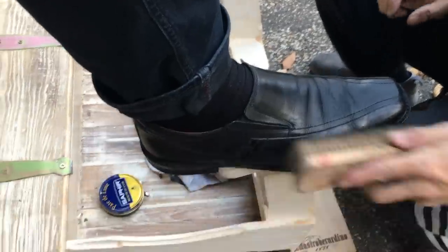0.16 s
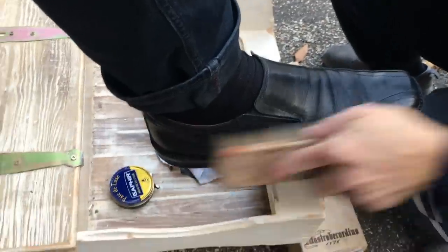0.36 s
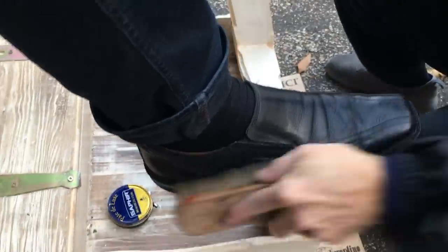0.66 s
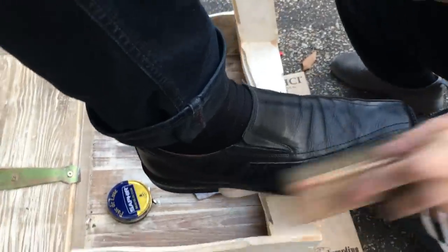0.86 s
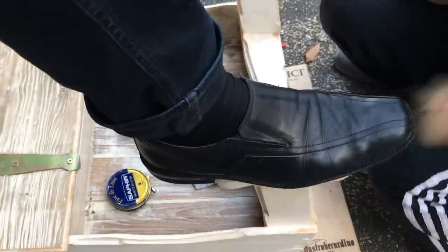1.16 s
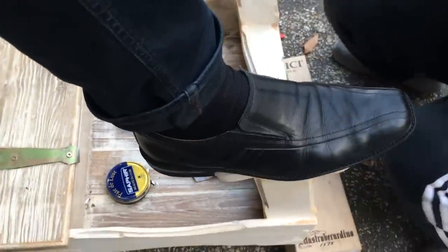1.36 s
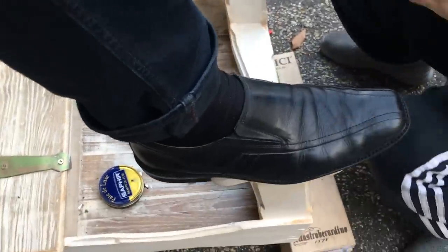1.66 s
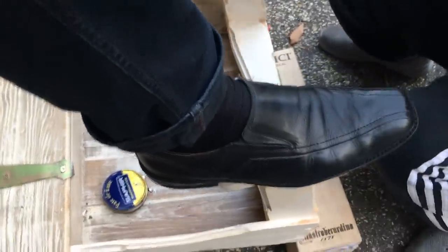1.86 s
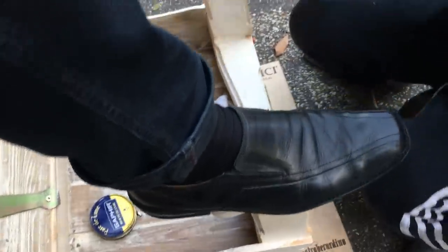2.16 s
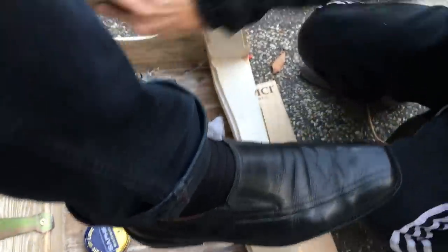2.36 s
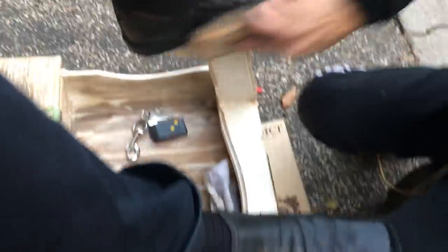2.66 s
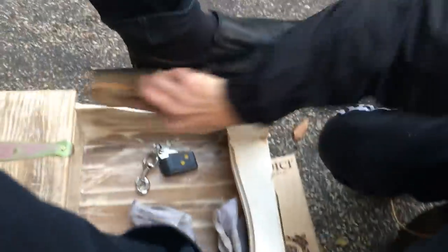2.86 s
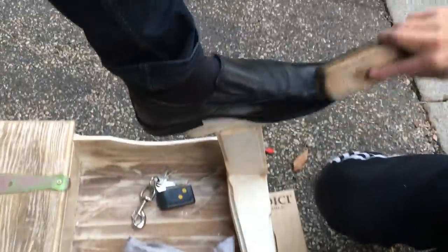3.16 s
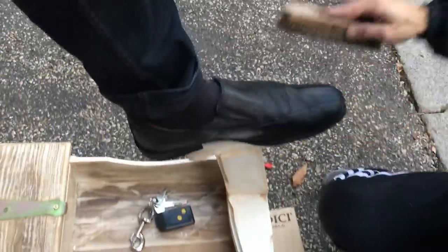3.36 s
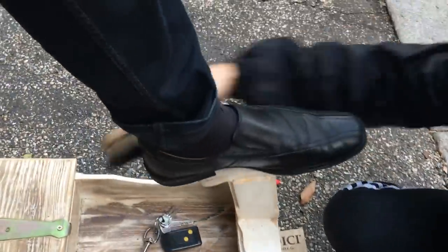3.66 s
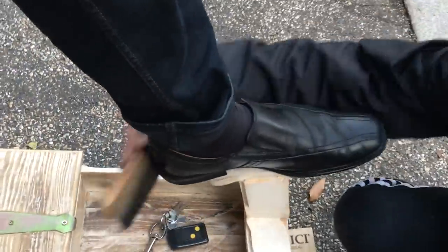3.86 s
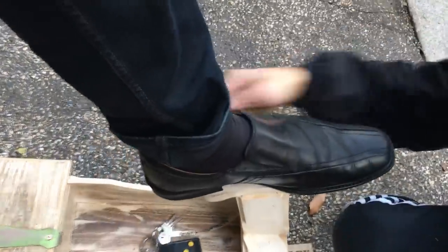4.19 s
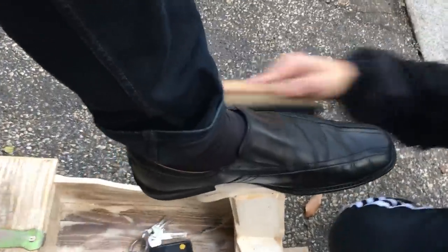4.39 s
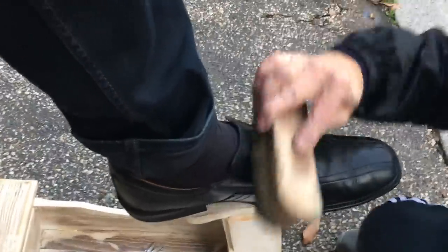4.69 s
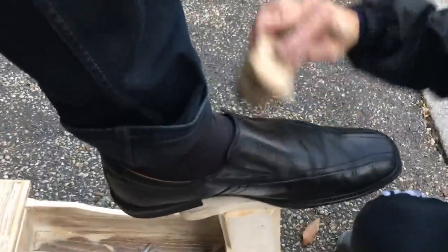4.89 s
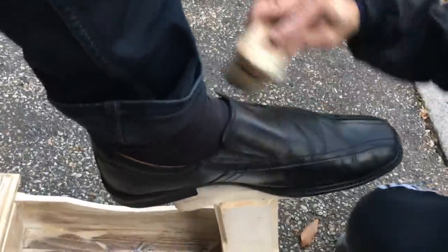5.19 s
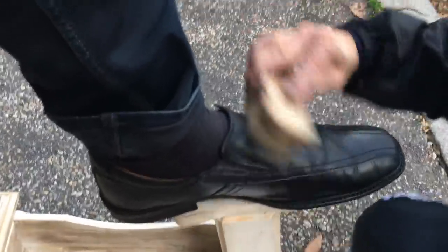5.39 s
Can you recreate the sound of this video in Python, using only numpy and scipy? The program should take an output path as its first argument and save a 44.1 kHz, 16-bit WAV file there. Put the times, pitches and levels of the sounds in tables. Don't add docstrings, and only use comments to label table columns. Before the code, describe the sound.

A shoe is brushed in brisk, scratchy bursts close by, the wooden block knocking now and then, while traffic hisses and a motor pulls away.

```python
import sys
import numpy as np
from scipy import signal
from scipy.fft import rfft, irfft
from scipy.io import wavfile
from scipy.ndimage import uniform_filter1d

SR = 44100
rng = np.random.default_rng(int(sys.argv[2]) if len(sys.argv) > 2 else 0)


def field_ratio(decibels):
    return 10 ** (np.asarray(decibels, dtype=float) / 20)


def file_out(sig):
    cols = np.atleast_2d(sig).T
    lim = np.clip(cols, -1, 1)
    pcm = np.round(lim * 32767).astype(np.int16)
    wavfile.write(sys.argv[1], SR, pcm)


N = 244314
T = np.arange(N) / SR
HZ = np.maximum(np.arange(N // 2 + 1) * SR / N, 1)


def unit(x):
    return x / np.sqrt(np.mean(x ** 2))


def colour(points):
    hz, db = np.transpose(points)
    return field_ratio(np.interp(np.log(HZ), np.log(hz), db))


def walk(rate_hz):
    k = int(SR / rate_hz)
    held = np.repeat(rng.standard_normal(N // k + 1), k)
    return 1.39 * uniform_filter1d(uniform_filter1d(held, k), k)[:N]


def bands(x, gain, lo_hz, hi_hz, flicker_db, rate_hz, level_db):
    spec, out = rfft(x) * gain, 0
    edges = np.geomspace(lo_hz, hi_hz, int(3 * np.log2(hi_hz / lo_hz)) + 1)
    for a, b in zip(edges, edges[1:]):
        band = irfft(spec * (HZ >= a) * (HZ < b), N)
        out = out + band * field_ratio(flicker_db * walk(rate_hz) + level_db(np.sqrt(a * b)))
    return out


def ring(push, modes, cycles):
    t = np.arange(len(push)) / SR
    body = 0
    for hz, db in modes:
        body = body + field_ratio(db) * np.sin(2 * np.pi * hz * t) * t * hz * np.exp(-t * hz / cycles)
    y = signal.fftconvolve(push, body)[:len(push)]
    return y / np.max(np.abs(y))


def street():
    # t/s, level/dB
    swell_points = [(0.0, -46), (0.2, -40), (0.52, -48.5), (0.55, -40), (2.56, -44.5), (2.59, -41),
                    (2.85, -45), (2.93, -41), (3.08, -47), (3.32, -41.5), (3.36, -53), (3.47, -36.5),
                    (3.55, -52), (3.61, -42.5), (5.09, -46), (5.28, -38), (5.4, -49), (5.54, -43)]
    # f/Hz, density/dB per Hz
    rumble_colour = [(20, -36), (31, -2.5), (40, -9.5), (52, 3), (64, 0), (80, -9.5), (115, -9.5),
                     (145, -13.5), (200, -14.5), (300, -22)]
    # f/Hz, density/dB per Hz
    tyre_colour = [(180, -29), (300, -2), (492, -6.5), (562, -4), (641, -4.5), (1330, -4), (1870, -10.5),
                   (2400, -20.5), (2980, -20.5), (4880, -30), (15500, -38)]
    split_hz = 300
    swell_db = np.interp(T, *np.transpose(swell_points))
    mean_db = np.mean(swell_db)
    hiss_db = -48 - 0.44 * T

    def throb_db(hz):
        return mean_db + np.clip(80 / hz, 0, 1) ** 2 * (swell_db - mean_db)

    rumble = bands(rng.standard_normal(N), colour(rumble_colour), 20, split_hz, 1.0, 2.95, throb_db)
    tyres = bands(rng.standard_normal(N), colour(tyre_colour), split_hz, 17000, 0.92, 6.6, lambda hz: hiss_db)
    return field_ratio(29.0) * rumble + field_ratio(14.5) * tyres


def engine():
    # t/s, third order f/Hz, third order level/dB
    run_up = [
        (0.0, 112.7, -44),
        (0.222, 114.0, -73),
        (0.42, 116, -43),
        (0.756, 119.3, -53.5),
        (0.952, 123.0, -41.5),
        (1.316, 123.3, -51.5),
        (1.444, 123.2, -54),
        (1.602, 125.2, -57),
        (1.9, 114.0, -59),
    ]
    s, third_hz, third_db = np.transpose(run_up)
    phase = 2 * np.pi * np.cumsum(np.interp(T, s, third_hz) / 3) / SR
    fade_db = -25 * np.maximum(T - s[-1], 0)
    orders = [(2, -42 - 10 * s), (3, third_db), (4, -48.5 - 7.5 * s)]
    out = 0
    for k, db in orders:
        wobble = field_ratio(0.54 * walk(9.1)) * np.exp(.6j * walk(14))
        level = np.sqrt(2) * field_ratio(np.interp(T, s, db) + fade_db)
        out = out + level * np.imag(wobble * np.exp(1j * k * phase))
    return out


def knocks():
    # t/s, peak level/dB, upper ring f/Hz, lower ring f/Hz, lower ring level/dB
    taps = [(.8673, -24, 2950, 1960, 12), (1.048, -33.5, 1460, 836, -4), (1.364, -42, 1650, 1000, 6),
            (1.8388, -29, 2800, 1530, 2), (2.0548, -34.5, 2020, 830, 6), (2.062, -40, 1980, 1060, 7),
            (2.0683, -33, 2060, 880, -7), (2.0905, -36, 1910, 690, 4), (4.605, -39, 3940, 2900, -10),
            (4.644, -31, 2160, 2460, 2), (4.6558, -25.5, 3360, 2000, -3), (4.6568, -27.5, 1440, 974, -8)]
    # t/s, peak level/dB, upper ring f/Hz, lower ring f/Hz, lower ring level/dB
    scuffs = [(.262, -39, 1930, 864, -1), (.267, -36, 2000, 870, -5), (.273, -34.5, 2130, 860, 5),
              (0.8682, -24, 1780, 1250, -1), (1.845, -34.5, 2100, 1250, -9), (2.0728, -31, 2060, 834, 0.5),
              (2.0835, -38, 2076, 1240, 0), (2.327, -36.5, 1860, 1140, -8), (2.708, -36, 1960, 1370, -5),
              (2.7641, -30, 3950, 1250, -2), (2.7692, -32.5, 1500, 1020, 8), (3.814, -35.5, 1800, 680, 0.5),
              (4.647, -33, 2230, 1020, -8), (4.6525, -36, 1980, 1560, -3), (4.987, -43, 1660, 1300, -13),
              (5.0285, -31.5, 2290, 1800, -11)]
    # f/Hz, level/dB
    wood = [(620, -6), (1300, -1.5), (1700, -1.5), (2050, 3), (3030, 1), (3450, -4)]
    # t/s, peak level/dB
    cracks = [(0.8675, -29), (0.868, -30), (0.8723, -29), (1.048, -55), (1.363, -43), (1.762, -40),
              (1.839, -38), (2.0548, -36), (2.0682, -35), (2.7645, -38), (3.5484, -35), (4.604, -34),
              (4.6433, -33), (4.656, -46), (4.99, -31)]
    # f/Hz, level/dB
    crack_modes = [(3300, -1), (4300, -2), (5400, 0), (6400, -9), (7600, -25), (9500, -5)]
    # t/s, peak level/dB, f/Hz, t60/s
    thuds = [
        (0.8689, -37.5, 510, 0.097),
        (0.868, -36.5, 400, 0.07),
        (1.052, -33.5, 314, 0.032),
        (1.839, -37, 338, 0.048),
        (2.072, -34, 606, 0.033),
        (2.770, -39, 500, 0.024),
        (3.816, -41, 410, 0.017),
        (3.819, -32.5, 188, 0.063),
        (4.6549, -28.5, 216, 0.041),
        (4.659, -30, 393, 0.017),
    ]
    size = 4096
    out, t = np.zeros(N + size), np.arange(size) / SR
    tap_ms, scuff_ms = 1.25, 2.24
    blows = [row + (tap_ms,) for row in taps] + [row + (scuff_ms,) for row in scuffs]
    for s, db, hi_hz, lo_hz, lo_db, ms in blows:
        draw = rng.standard_normal(size)
        push = draw ** 3 / 2 * np.exp(-(1000 * t / ms) ** 4)
        push[0] = 4
        hit = ring(push, wood + [(hi_hz, 0), (lo_hz, lo_db + 0.5)], 1.42)
        rustle = 0.19 * draw * np.exp(-t / 0.0054)
        spread = ring(push + rustle, [(hi_hz, 0), (lo_hz, lo_db)], 0.63)
        out[int(s * SR):][:size] += field_ratio(db) * (hit + 0.66 * spread)
    for s, db in cracks:
        burst = rng.standard_normal(size) * np.exp(-t / 0.0023)
        out[int(s * SR):][:size] += field_ratio(db) * ring(burst, crack_modes, 1.0)
    for s, db, hz, t60 in thuds:
        out[int(s * SR):][:size] += field_ratio(db) * np.sin(2 * np.pi * hz * t) * 1000. ** (-t / t60)
    return out[:N]


def pressure():
    # full contact t/s, hold/s, level/dB, drift over hold/dB, lift-off/dB per s
    side = [
        (0.0, 0.11, -51, -4, 123),
        (.422, 0.088, -48.5, -5.5, 300),
        (.764, 0.094, -46.5, -6.5, 400),
        (1.096, 0.14, -46.5, -7.5, 1200),
        (1.78, 0.12, -56, 7, 111),
        (2.105, 0.1, -53.5, 1, 696),
        (2.29, 0.073, -53.5, 0.5, 140),
        (2.5, 0.12, -55, 1.5, 420),
        (2.722, 0.069, -47.5, -3, 198),
        (2.935, 0.086, -59, 10, 61),
    ]
    # full contact t/s, hold/s, level/dB, drift over hold/dB, lift-off/dB per s
    back = [
        (.272, 0.026, -50.5, -1.5, 278),
        (.618, 0.048, -50, -1, 270),
        (.912, 0.087, -51.5, 1.5, 238),
    ]
    # full contact t/s, hold/s, level/dB, drift over hold/dB, lift-off/dB per s
    heel = [
        (3.547, 0.28, -60, 6.5, 252),
        (3.932, 0.12, -54, -9.5, 900),
        (4.2, 0.11, -58.5, 8, 280),
        (4.375, 0.055, -56.5, 9, 300),
        (4.43, 0.087, -48.5, -3, 463),
    ]
    # full contact t/s, hold/s, level/dB, drift over hold/dB, lift-off/dB per s
    instep = [
        (4.07, 0.045, -52.5, -2.5, 160),
        (4.655, 0.047, -48, -2.5, 192),
        (4.77, 0.08, -52.5, 5.5, 605),
        (4.946, .04, -56.5, -8, 500),
        (4.993, 0.06, -46, 1, 800),
        (5.1, 0.082, -47.5, 0.5, 700),
        (5.292, 0.06, -45, 1, 480),
        (5.414, 0.083, -44.5, -4, 600),
    ]
    # full contact t/s, hold/s, level/dB, drift over hold/dB, lift-off/dB per s
    grazes = [
        (1.27, 0.06, -65.5, 4.5, 300),
        (1.464, .005, -66, 3, 800),
        (1.658, 0.082, -63, -1, 300),
        (3.25, 0.15, -60, -0.5, 127),
        (4.597, 0.047, -62, 1, 100),
    ]
    # full contact t/s, hold/s, level/dB, drift over hold/dB, lift-off/dB per s
    flicks = [(.07, 0.032, -57, -1, 302), (.375, .02, -65, 1.1, 300), (1.225, 0.01, -55, .1, 1200),
              (1.43, .025, -72, .1, 500), (1.6, .03, -72, .1, 600), (2.055, 0.026, -67, 5, 399.5),
              (2.262, .02, -67, 7, 300), (2.462, .03, -68, .1, 300), (2.575, .065, -59, 0, 700),
              (2.7, .02, -70, .1, 300), (3.265, 0.02, -65, .1, 500), (3.93, .035, -64, 1, 400),
              (4.77, .04, -62, 5, 300), (4.855, 0.0089, -51, -8, 900), (4.95, 0.017, -66, 4, 600),
              (5.19, 0.0098, -62, -3, 1200), (5.495, 0.011, -57, -5, 903)]
    # full contact t/s, hold/s, level/dB, drift over hold/dB, lift-off/dB per s
    presses = [
        (.358, 0.027, -66, 4, 300),
        (.615, 0.026, -58, .1, 302),
        (2.258, .012, -63, .1, 400),
        (2.61, 0.028, -61, .1, 500),
        (2.72, 0.024, -67, -3.5, 300),
        (3.815, 0.018, -60, 1, 300),
        (4.662, 0.028, -58, -4, 300),
    ]
    rustle_db = [-54, -66, -77.5, -80]
    follow = [.55, .8, 1, 1.25]
    # rows, landing/dB per s, (hollow, leather, tips, finest tips)/dB, brightening along hold/dB
    kinds = [(side, 440, (1.6, 2.3, 0, 3.6), .6),
             (back, 292, (4, 1, 0, 1.5), 5.5),
             (heel, 556, (-4, -0.1, 0, -0.5), 1.5),
             (instep, 711, (-6.5, -2, 0, -3.5), 1.5),
             (grazes, 600, (-10, 0, 0, -6), 0),
             (flicks, 500, (-15, -18, 0, 7.5), 0),
             (presses, 502, (10.5, 7, 0, -8), 0)]
    t = T[::32]
    power = field_ratio(np.array(rustle_db))[:, None] ** 2
    for rows, landing, parts_db, brighten_db in kinds:
        for s, hold, db, drift_db, lift in rows:
            along = np.clip((t - s) / hold, 0, 1)
            shape_db = drift_db * along
            shape_db = shape_db - landing * np.maximum(s - t, 0) - lift * np.maximum(t - s - hold, 0)
            top_db = max(drift_db, 0)
            tilt_db = np.outer([-.3, -0.32, -0.049, 0.83], brighten_db * (along - 1))
            over_db = np.array(parts_db)[:, None] + tilt_db
            power = power + field_ratio(db + top_db + over_db + np.outer(follow, shape_db - top_db)) ** 2
    return [np.interp(T, t, 10 * np.log10(p)) for p in power]


def brush():
    # f/Hz, density/dB per Hz
    brush_colour = [(500, -13), (900, 2), (1500, 3), (2200, 2), (3200, -0.5), (4500, -0.66), (6200, -2),
                    (8500, -1.5), (12000, -2), (15800, -5.5)]
    parts_hz = [1400, 3200, 7000, 13000]
    parts = pressure()
    ticks = (rng.random(N) < .5) * rng.standard_normal(N) * field_ratio(0.48 * rng.exponential(size=N))
    ticks = unit(ticks) * field_ratio(0.71 * walk(120) + 0.95 * walk(35))

    def level_db(hz):
        total = 0
        for part, peak in zip(parts, np.eye(4)):
            total = total + np.interp(np.log(hz), np.log(parts_hz), peak) * part
        return total

    return field_ratio(8.5) * bands(ticks, colour(brush_colour), 500, 17000, 0.54, 24.99, level_db)


def scene():
    mono = street() + engine() + knocks() + brush()
    return np.array([mono, mono])


def roll_off(x):
    return signal.sosfilt(signal.butter(12, 17060, fs=SR, output="sos"), x)


def record(dry):
    # f/Hz, width/Hz, depth/dB
    dips = [(4920, 330, -4), (10500, 260, -6)]
    low_cut_hz, top_hz = 27.6, 15830
    dips_db = sum(db * np.exp(-((HZ - hz) / width) ** 2) for hz, width, db in dips)
    response = field_ratio(dips_db) * (HZ < top_hz) / (1 + (low_cut_hz / HZ) ** 4)
    return roll_off(irfft(rfft(dry) * response, N))


dry = scene()
out = record(dry)
file_out(out)
```